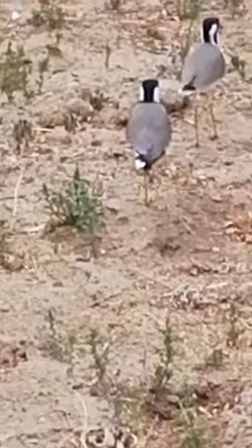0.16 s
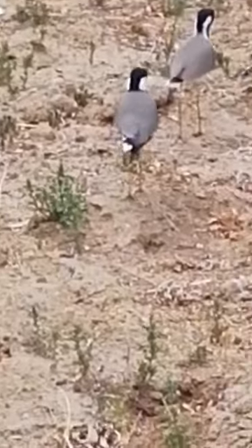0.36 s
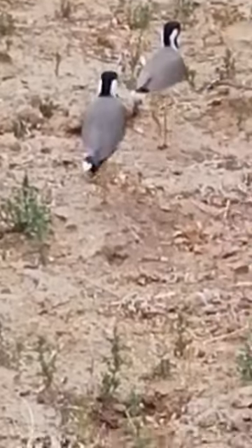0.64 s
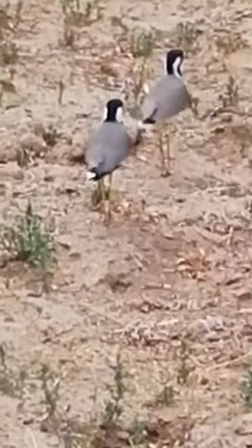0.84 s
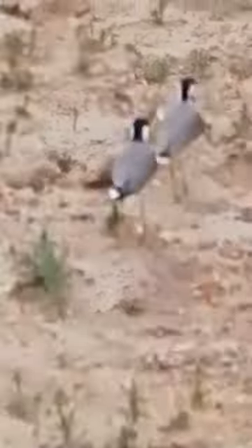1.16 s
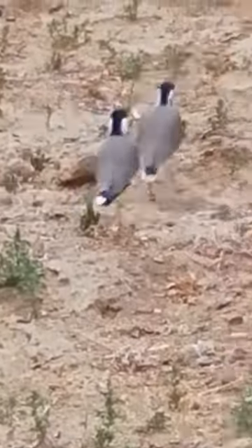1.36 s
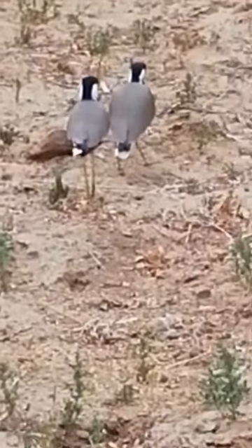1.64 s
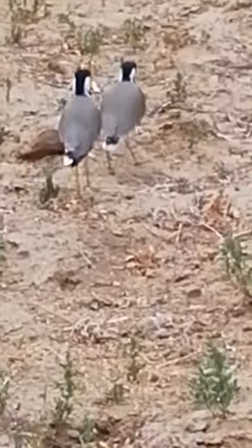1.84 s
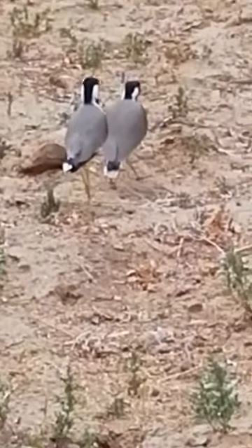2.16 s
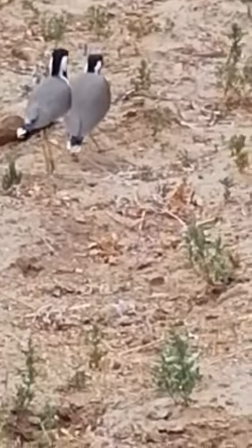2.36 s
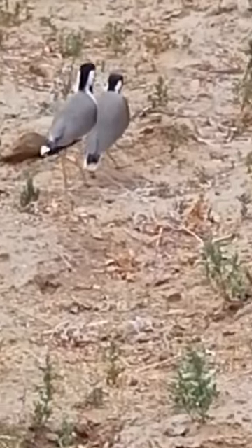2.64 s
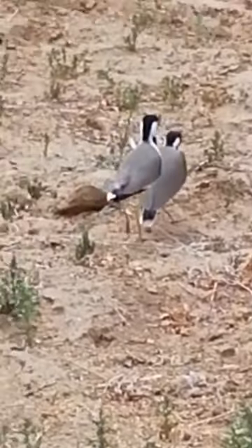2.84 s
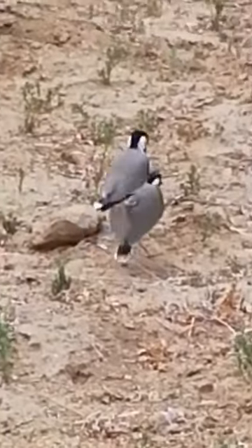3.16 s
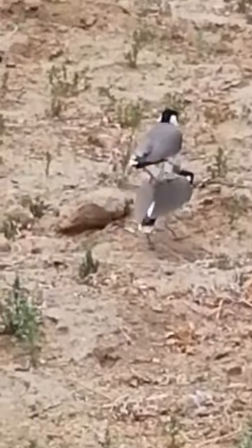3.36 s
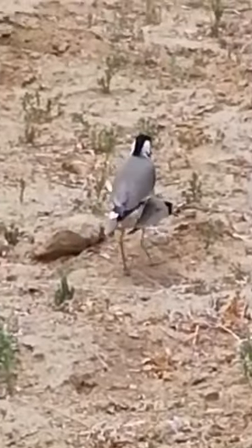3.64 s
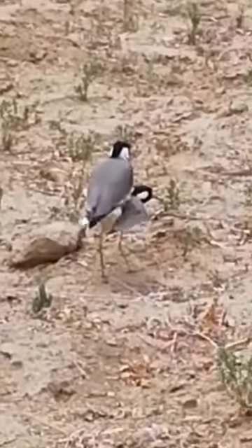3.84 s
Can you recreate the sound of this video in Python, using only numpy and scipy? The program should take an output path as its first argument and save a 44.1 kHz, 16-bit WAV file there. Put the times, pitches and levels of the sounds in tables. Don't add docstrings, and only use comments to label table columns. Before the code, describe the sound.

Lapwing calls lead. Silence until 0.4 s, then dull faint wash, thin hiss and a faint falling call. Dry ticks run about twelve per second from 0.5 s, louder after 1.9; short falling cries at 1.0, 1.4, 2.2, 2.5 and 3.2. A distant whistle slides upward at 2.7. From 3.3 rough paired syllables, brief twitter at 3.65, closing rattle at 3.95; wind thumps from 2.9.

```python
import sys
import numpy as np
from scipy import signal
from scipy.fft import rfft, irfft
from scipy.io import wavfile
from scipy.ndimage import uniform_filter1d

SR = 44100
rng = np.random.default_rng(int(sys.argv[2]) if len(sys.argv) > 2 else 0)


def ratio_of_db(decibels):
    return 10 ** (np.asarray(decibels, float) / 20)


def unload_audio(sound):
    columns = np.transpose(np.atleast_2d(sound))
    steps = np.round(np.clip(columns, -1, 1) * 32767)
    wavfile.write(sys.argv[1], SR, steps.astype(np.int16))


N = 176400

# frequency in Hz, gain in dB.
THROAT = [(1150, -25.5), (2300, -4), (3500, 0.5), (4800, -3.5), (6200, -8), (7300, -24), (8600, -14),
          (12000, -20)]
SYLLABLE_RISE_S, SYLLABLE_ARCH = 0.0029, 0.052
CALM_RASP, CALM_JITTER = 0.09, 0.008


def evened(x):
    return x / np.sqrt(np.mean(x ** 2) + 1e-20)


def slow_noise(shape, size):
    return uniform_filter1d(uniform_filter1d(rng.standard_normal(shape), size), size)


def read(points, hz):
    f, value = np.transpose(points)
    return np.interp(np.log(hz + 1), np.log(f + 1), value)


def add(mix, start_s, sound):
    part = mix[..., round(start_s * SR):][..., :len(sound)]
    part += sound[:part.shape[-1]]


def colour(x, points):
    cepstrum = irfft(np.log(ratio_of_db(read(points, np.fft.rfftfreq(2048, 1 / SR)))))
    cepstrum[1:1024] *= 2
    cepstrum[1025:] = 0
    response = irfft(np.exp(rfft(cepstrum)))[:1024]
    return signal.oaconvolve(x, response)[:len(x)]


def ports(x, pan, turn):
    hz = np.fft.rfftfreq(N, 1 / SR)
    half = ratio_of_db(read(pan, hz) / 2) * np.exp(.5j * read(turn, hz))
    return irfft(rfft(x) * np.array([half, 1 / half]), N)


def echoes(x, t60_s, first_s):
    t = np.arange(SR // 2) / SR
    taps = rng.standard_normal((2, len(t))) * ratio_of_db(-60 * t / t60_s) * (t > first_s)
    taps = taps / np.linalg.norm(taps[0])
    return signal.fftconvolve(np.atleast_2d(x), taps, axes=1)[:, :N]


def air(tone, same, pan, field_db, size, patchy_db, smooth):
    hop = size // 4
    frames, hz = N // hop + 5, np.fft.rfftfreq(size, 1 / SR)
    a, b, c, d, patches = rng.standard_normal((frames, len(hz), 5)).T
    patches = uniform_filter1d(patches, smooth[0], 0)
    patches = evened(uniform_filter1d(patches, smooth[1], 1))
    like = np.clip(read(same, hz), -1, 1)[:, None]
    left = a + 1j * b
    right = like * left + np.sqrt(1 - like ** 2) * (c + 1j * d)
    side = ratio_of_db(read(pan, hz)[:, None] / 2)
    z = np.array([left * side, right / side])
    moving_db = field_db(np.arange(frames) * hop / SR, hz[:, None])
    z *= ratio_of_db(read(tone, hz)[:, None] + patchy_db * patches + moving_db)
    return evened(signal.istft(z, nperseg=size, noverlap=size - hop)[1][:, :N])


def voice(length_s, db, hz, low_db, sag, rise_s, fade_db, curve, tilt_db, arch, rasp,
          jitter=CALM_JITTER, throat=THROAT, dulling_db=-17, opening_db=0):
    arch_share, opening_s, uneven_db = 0.11, 0.0044, 2.5
    t = np.arange(0, length_s, 1 / SR)
    u = t / length_s
    wobble, breath = rng.standard_normal((2, 4000))[:, :len(t)]
    wobble = evened(uniform_filter1d(wobble, 60))
    pitch_hz = hz * (1 - sag * u ** curve - arch * np.exp(-u / arch_share) + jitter * wobble)
    turns = np.cumsum(pitch_hz) / SR
    uneven = rng.standard_normal(13) * np.clip((np.arange(13) - 3) / 4, 0, 1)
    late_db = opening_db * np.exp(-t / opening_s)
    dull_db = dulling_db * u ** 3.42
    pulses = 0
    for k in range(1, 13):
        partial_db = tilt_db * max(k - 3, 0) + low_db * (k < 3) + uneven_db * uneven[k]
        partial_db = partial_db + late_db * max(k - 4, 0) + dull_db * max(k - 2, 0)
        pulses = pulses + ratio_of_db(partial_db) * np.cos(2 * np.pi * k * (turns - .7))
    attack = np.minimum(t / rise_s, 1) ** 2
    release = np.minimum((length_s - t) / 0.0014, 1)
    shape = attack * ratio_of_db(fade_db * u ** curve) * release
    drive = np.pad(shape * (pulses + 3 * rasp * breath), (0, 400))
    return ratio_of_db(db) * colour(drive, list(throat) + [(14500, -38)])


def wash():
    # frequency in Hz, density in dB per Hz.
    tone = [(120, 7)] + list([(450, -2.5), (1150, 1), (1900, -4.5), (2700, -9.5), (3500, -12.5), (6300, -7),
                              (8000, -13), (15500, -20.5)])
    # frequency in Hz, left-right likeness 0 to 1.
    same = [(400, 0.72), (1200, 0.65), (8000, 0.07)]
    # frequency in Hz, left-right level in dB.
    pan = [(500, -3), (4000, 2), (12000, -4.5)]
    # time in seconds, level in dB.
    opening = [(.4, -77), (.6, -72), (1.001, -67.5), (1.5, -61.5), (2.1, -62.5), (2.6, -60), (4., -57.5)]

    def dull_db(t, hz):
        return -4.5 * np.clip(1 - t / 3.2, 0, 1) * np.log2(np.maximum(hz / 2000, 1))

    noise = air(tone, same, pan, dull_db, size=1024, patchy_db=1.16, smooth=(10, 10))
    return noise * ratio_of_db(np.interp(np.arange(N) / SR, *np.transpose(opening)))


def wind():
    # time in seconds, level in dB.
    gusts = [(.42, -65.5), (1.45, -57.5), (1.62, -51), (1.77, -59), (1.95, -53), (2.1, -57.5), (2.51, -60),
             (2.55, -44), (2.8, -51.5), (2.9, -38.5), (3.08, -46.5), (3.209, -34.5), (3.349, -54),
             (3.452, -33), (3.528, -36.5), (3.63, -35), (3.8, -48), (3.95, -43)]
    tone = list([(12, -27), (59, 3), (103, -11.5), (190, -13.5), (300, -29.5), (500, -43.5)]) + [(1500, -72)]
    # frequency in Hz, left-right likeness 0 to 1.
    same = [(40, .985), (300, .45)]
    # frequency in Hz, left-right level in dB.
    pan = [(100, 0.1)]
    s, db = np.transpose(gusts)

    def bright_db(t, hz):
        reach = np.clip(np.log2((hz + 1) / 60), 0, 2) / 2
        return 0.15 * (np.interp(t, s, db) + 31.0) * reach

    noise = air(tone, same, pan, bright_db, size=1024, patchy_db=3.0, smooth=(6, 4))
    return noise * ratio_of_db(np.interp(np.arange(N) / SR, s, db))


def hiss():
    # frequency in Hz, density in dB per Hz.
    tone = [(1500, -15), (6000, 0), (15500, -4)]
    return ratio_of_db(-83.5) * np.array([evened(colour(v, tone)) for v in rng.standard_normal((2, N))])


def falling_calls():
    # start in seconds, length in seconds, level in dB, pitch in Hz, tilt in dB per partial.
    events = [
        (0.418, 0.045, -56.5, 1113, -0.5),
        (1.02, 0.046, -41.5, 1204, -0.5),
        (1.369, 0.041, -39, 1218, 0.16),
        (2.175, 0.04, -38.5, 1236, 0.8),
        (2.5309, 0.039, -37, 1201, 0.28),
        (3.1607, 0.035, -38, 1133, 0.1),
    ]
    out = np.zeros(N)
    for start_s, length_s, db, hz, tilt_db in events:
        call = voice(length_s, db, hz, low_db=0.15, sag=0.295, rise_s=0.0015, fade_db=2.5, curve=3.37,
                     tilt_db=tilt_db, arch=0.017, rasp=CALM_RASP, opening_db=-4)
        add(out, start_s, call)
    return out


def ticks():
    # start in seconds, length in seconds, level in dB, pitch in Hz,
    # lowest two partials in dB.
    tick_rows = [(0.531, 0.0047, -61, 1164, 6.5), (0.611, 0.0016, -52, 1110, 8),
                 (0.6871, 0.0029, -52.5, 1160, 6.5), (0.764, 0.0034, -57, 1124, 8.5),
                 (0.8445, 0.0042, -56, 1156, 4.5), (0.924, 0.0035, -56, 1180, 6),
                 (1.0013, 0.0062, -56, 1170, 5), (1.079, 0.0057, -52, 1166, 4), (1.1663, 0.0038, -52, 1175, 5),
                 (1.2468, 0.0036, -48.5, 1163, 3.5), (1.331, 0.0073, -46, 1202, 3),
                 (1.412, 0.0033, -43.5, 1200, 3), (1.495, 0.0042, -51, 1175, 11),
                 (1.577, 0.0034, -47, 1173, 7.5), (1.657, 0.003, -50, 1167, 7),
                 (1.7375, 0.0039, -47, 1140, 4.5), (1.8135, 0.0045, -48.5, 1154, 1.5),
                 (1.8927, 0.0031, -40.5, 1183, -3), (1.9738, 0.0038, -39.5, 1155, 0),
            (2.053, 0.0038, -39.5, 1170, -1.5), (2.134, 0.0038, -45, 1132, 0.5),
            (2.2155, 0.0032, -36.5, 1140, 0.5), (2.2938, 0.0029, -34, 1153, -4.5),
            (2.3749, 0.0043, -38.5, 1128, -2.5), (2.4526, 0.0041, -37, 1126, -3),
            (2.613, 0.0031, -32.5, 1130, -2.5), (2.693, 0.005, -33, 1083, -6.5),
            (2.7716, 0.0047, -37, 1048, -3), (2.857, 0.0045, -33, 1070, 0.5),
            (2.9401, 0.0032, -32.5, 1042, -1.5), (3.0232, 0.0038, -33.5, 1056, -1),
            (3.1044, 0.01, -34, 1083, -0.5), (3.1885, 0.011, -32.5, 1109, -3.5)]
    # frequency in Hz, gain in dB.
    beak = [(1150, -20), (2300, -4), (3500, -1.9), (4700, -7), (5900, -8), (7000, -13), (8500, -21),
            (11000, -44)]
    rise_s, stretch, ring_q, ring_db = 0.00096, 1.273, 15, -2.5
    out = np.zeros(N)
    for start_s, length_s, db, hz, low_db in tick_rows:
        tick = voice(length_s * stretch, db, hz, low_db, sag=0.07, rise_s=rise_s, fade_db=-10.2, curve=1.48,
                     tilt_db=0.1, arch=0, rasp=0.3, throat=beak)
        ring = signal.lfilter(*signal.iirpeak(3 * hz, ring_q, SR), tick)
        add(out, start_s - rise_s, tick + ratio_of_db(ring_db) * ring)
    return out


def twitter():
    # start in seconds, length in seconds, level in dB, start pitch in Hz, end pitch in Hz.
    glides = [
        (3.646, 0.013, -53, 7670, 4380),
        (3.652, 0.015, -51.5, 4360, 5760),
        (3.671, 0.009, -59, 5720, 3000),
        (3.678, 0.011, -68, 6300, 5550),
        (3.681, .018, -69, 3030, 2550),
        (3.765, 0.014, -55.5, 3820, 3320),
        (1.21, 0.11, -70, 1470, 1432),
        (1.976, 0.017, -76, 7000, 6700),
    ]
    out = np.zeros(N)
    for start_s, length_s, db, from_hz, to_hz in glides:
        u = np.arange(0, length_s, 1 / SR) / length_s
        turns = np.cumsum(from_hz + (to_hz - from_hz) * u ** 0.596) / SR
        add(out, start_s, ratio_of_db(db + 7.5) * np.sin(np.pi * u) ** .5 * np.sin(2 * np.pi * turns))
    return out + ratio_of_db(-2.5) * echoes(out, t60_s=0.5, first_s=.004)


def buffets():
    # time in seconds, peak level in dB, frequency in Hz, length in seconds.
    swings = [(2.902, -32, 88, 0.0044), (3.199, -24, 67, 0.004), (3.471, -19.5, 88, 0.0063),
              (3.54, -31.5, 77, 0.0082), (3.577, -27, 65, 0.0079), (3.602, -24, 95, 0.011),
              (4.6, -28.5, 78, 0.02), (2, -30, 90, 0.0081), (3.671, -35, 74, 0.0056),
              (2.7, -38, 66, 0.0064), (3.4, -33, 105, 0.0096)]
    lag_s = .0003
    t = np.arange(N) / SR + lag_s * np.array([[1], [-1]])
    out = np.zeros((2, N))
    for s, db, hz, length_s in swings:
        out += ratio_of_db(db) * np.exp(-((t - s) / length_s) ** 2) * np.cos(2 * np.pi * hz * (t - s))
    return out


def whistle():
    # time in seconds, pitch in Hz, level in dB.
    glide = [
        (2.686, 2970, -77),
        (2.698, 3020, -45.5),
        (2.716, 3350, -44.5),
        (2.735, 3890, -42.5),
        (2.746, 4170, -46),
        (2.756, 4290, -45),
        (2.766, 5000, -34.5),
        (2.778, 5385, -42),
        (2.797, 5144, -38),
    ]
    over_db = [0, -20, -24]
    pan_db = [5, -8, -14]
    waver_share, rasp, flutter_db, top_hz = .018, .4, 5, 12300
    s, hz, db = np.transpose(glide)
    t = np.arange(N) / SR
    waver, *flutter = [evened(v) for v in slow_noise((4, N), 130)]
    pitch_hz = np.interp(t, s, hz) * (1 + waver_share * waver)
    turns = np.cumsum(pitch_hz) / SR
    level = ratio_of_db(np.interp(t, s, db, -160, -160)) * (1 + rasp * evened(slow_noise(N, 40)))
    parts = []
    for k, partial_db in enumerate(over_db):
        audible = (k + 1) * pitch_hz < top_hz
        strength = ratio_of_db(partial_db + flutter_db * flutter[k]) * level * audible
        parts.append(strength * np.sin(2 * np.pi * (k + 1) * turns))
    direct = sum(p * ratio_of_db([[pan / 2], [-pan / 2]]) for p, pan in zip(parts, pan_db))
    near_echo = echoes(direct, t60_s=0.11, first_s=0)
    far_echo = echoes(parts[0], t60_s=0.58, first_s=0.011) * ratio_of_db([[2.1], [-2.1]])
    return ratio_of_db(-7) * direct + near_echo + ratio_of_db(-3.5) * far_echo


def beak_snaps():
    # start in seconds, level in dB.
    snaps = [
        (2.686, -48),
        (9, -37),
        (3.702, -47),
    ]
    # frequency in Hz, gain in dB.
    tone = [(2000, -30), (5000, 10), (9000, 12), (12000, -15)]
    decay_s = 0.0011
    out = np.zeros(N)
    for start_s, db in snaps:
        burst = rng.standard_normal(200) * np.exp(-np.arange(200) / (decay_s * SR))
        add(out, start_s, ratio_of_db(db) * colour(burst, tone))
    return out


def broken_syllables():
    # start in seconds, length in seconds, level in dB, pitch in Hz, lowest two partials in dB.
    events = [(3.279, 0.013, -36, 1257, 3), (3.293, 0.017, -45.5, 1167, 7.5), (3.38, 0.014, -43, 1347, 7),
              (3.391, 0.018, -39.5, 1278, 6), (3.4805, 0.011, -43.5, 1272, 2.5),
              (3.493, 0.022, -46.5, 1244, 6), (3.584, 0.014, -33, 1330, -2),
              (3.599, 0.016, -37.5, 1221, 3.5), (3.7033, 0.021, -29.5, 1274, -4),
              (3.717, 0.023, -37.5, 1197, 2.5), (3.826, 0.012, -42, 1315, 2), (3.841, 0.013, -37, 1356, .3),
              (3.851, 0.019, -51.5, 1195, 11)]
    out = np.zeros(N)
    for start_s, length_s, db, hz, low_db in events:
        syllable = voice(length_s, db, hz, low_db, sag=0.12, rise_s=SYLLABLE_RISE_S, fade_db=-10.5, curve=2.54,
                         tilt_db=-2.5, arch=SYLLABLE_ARCH, rasp=.3, jitter=.016)
        add(out, start_s, syllable)
    return out


def closing_rattle():
    # start in seconds, length in seconds, level in dB, pitch in Hz, lowest two partials in dB.
    events = [
        (3.948, 0.0095, -35, 1432, 1),
        (3.956, 0.011, -34, 1399, 0.5),
        (3.971, 0.0112, -32.5, 1434, -2.5),
        (3.984, 0.021, -32, 1402, -1.5),
    ]
    out = np.zeros(N)
    for start_s, length_s, db, hz, low_db in events:
        pulse = voice(length_s, db, hz, low_db, sag=0.11, rise_s=SYLLABLE_RISE_S, fade_db=-2, curve=4.7,
                      tilt_db=-2.5, arch=SYLLABLE_ARCH, rasp=CALM_RASP, dulling_db=1.5)
        add(out, start_s, pulse)
    return out


def lapwings():
    # frequency in Hz, left-right level in dB.
    pan = [(1200, -3), (2300, -1.5), (3500, -6), (4800, 1), (6000, 7), (7200, -17), (9000, 3),
           (12000, -17.5)]
    # frequency in Hz, phase lead of the left in radians.
    turn = [(1500, 0.73), (5000, 0.94), (12000, 1.9)]
    birds = falling_calls() + ticks() + beak_snaps() + broken_syllables() + closing_rattle()
    near = ports(birds, pan, turn)
    scatter = ratio_of_db(-8) * echoes(near, t60_s=0.013, first_s=0.002)
    field = ratio_of_db(-15.5) * echoes(birds, t60_s=0.39, first_s=0.0072)
    return near + scatter + field


def scene():
    return wash() + wind() + hiss() + lapwings() + twitter() + buffets() + whistle()


def roll_off(x):
    return signal.sosfilt(signal.butter(12, 16060, fs=SR, output="sos"), x)


def record(dry):
    start_s, offset, settle_s = .39676, -0.0034, 0.19
    notch_hz, notch_width_hz, notch_db, edge_hz = 7500, 300, -8, 15780
    t = np.arange(N) / SR - start_s
    hz = np.fft.rfftfreq(N, 1 / SR)
    notch = ratio_of_db(notch_db * np.exp(-((hz - notch_hz) / notch_width_hz) ** 2))
    heard = irfft(rfft(dry) * notch * (hz < edge_hz), N)
    settling = offset * np.exp(-np.maximum(t, 0) / settle_s)
    return roll_off((heard + settling) * (t >= 0))


dry = scene()
out = record(dry)
unload_audio(out)
```